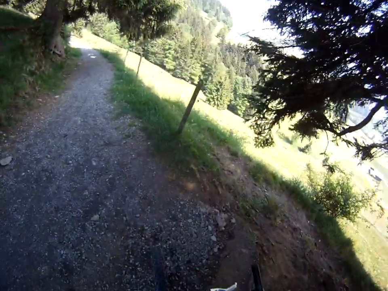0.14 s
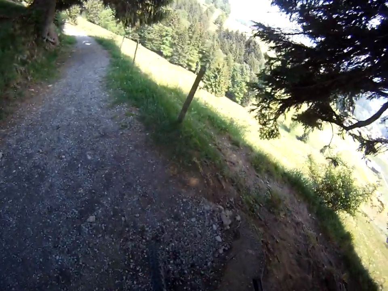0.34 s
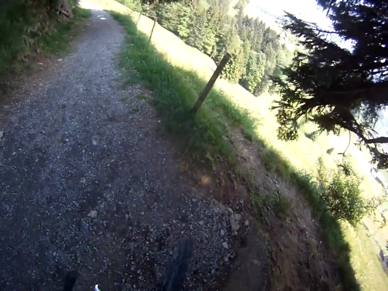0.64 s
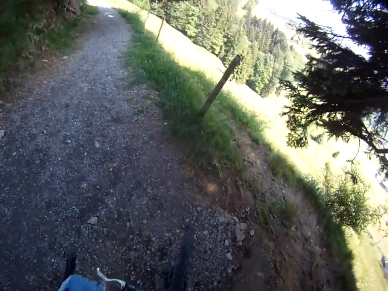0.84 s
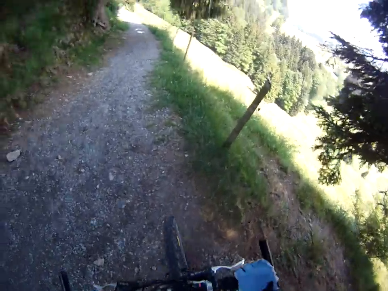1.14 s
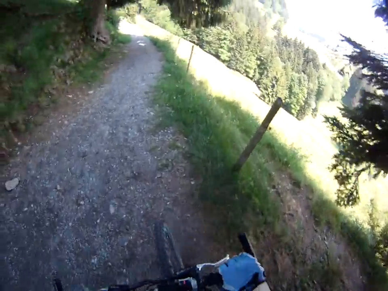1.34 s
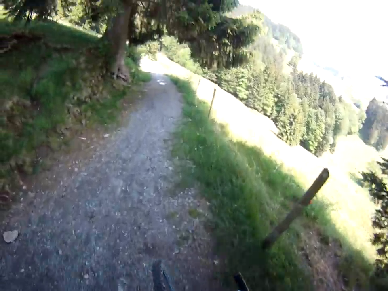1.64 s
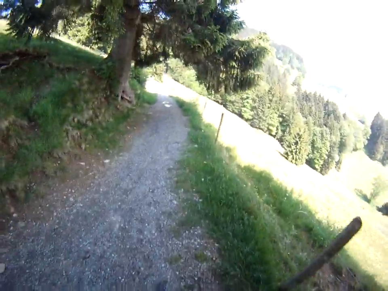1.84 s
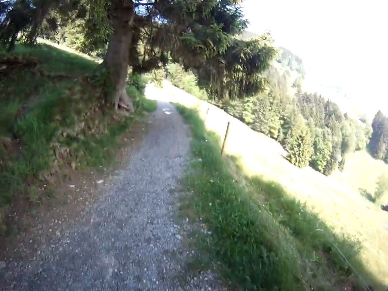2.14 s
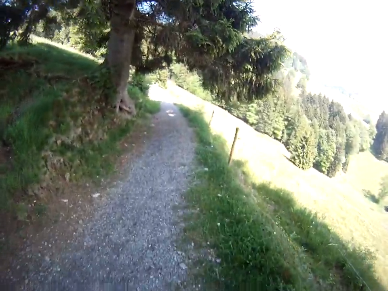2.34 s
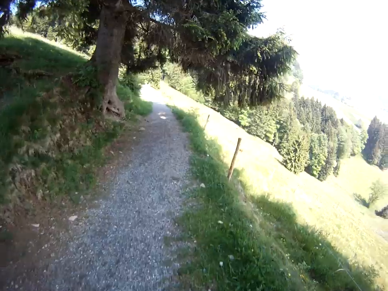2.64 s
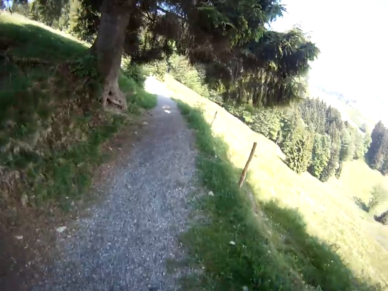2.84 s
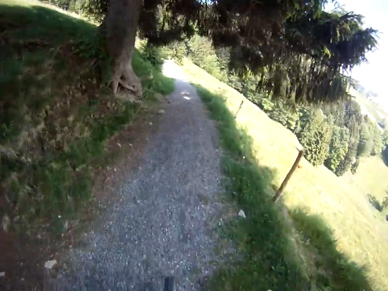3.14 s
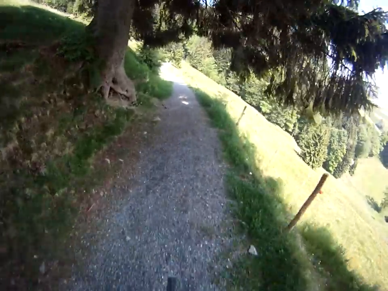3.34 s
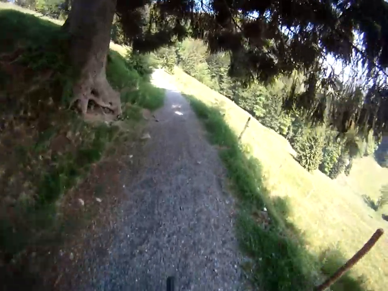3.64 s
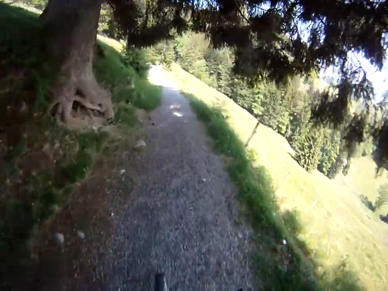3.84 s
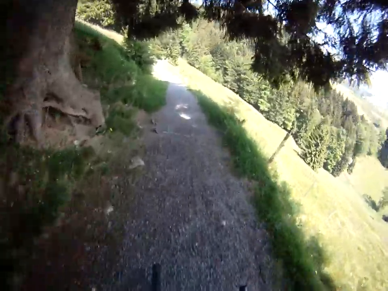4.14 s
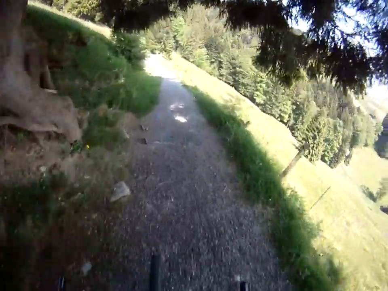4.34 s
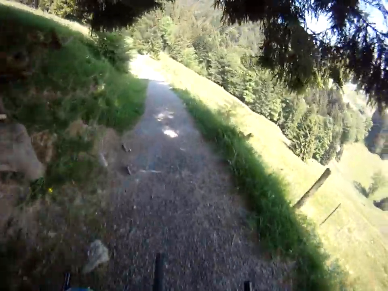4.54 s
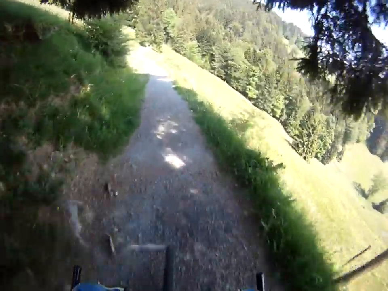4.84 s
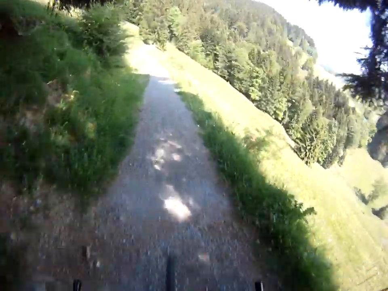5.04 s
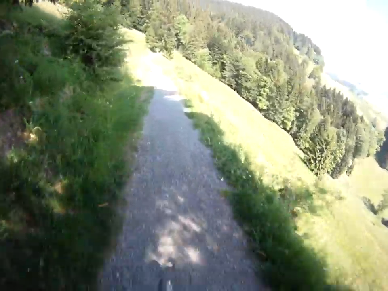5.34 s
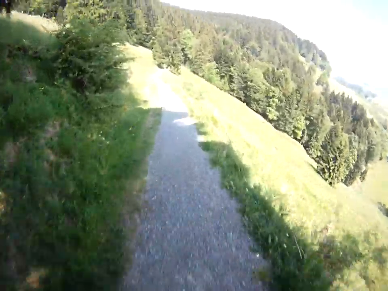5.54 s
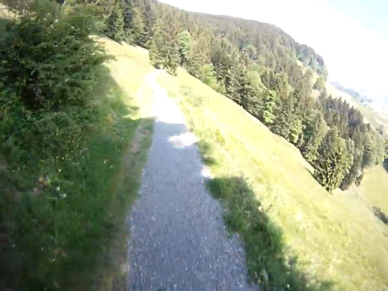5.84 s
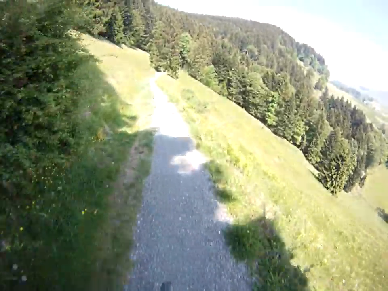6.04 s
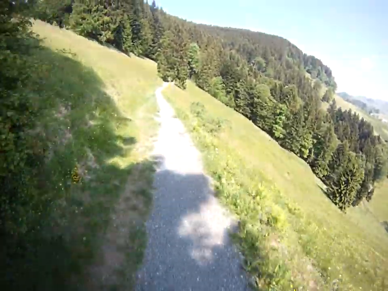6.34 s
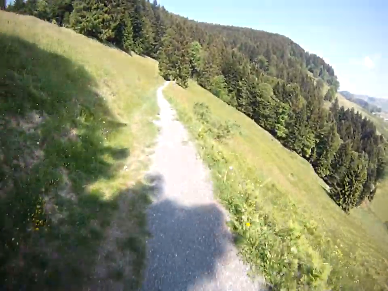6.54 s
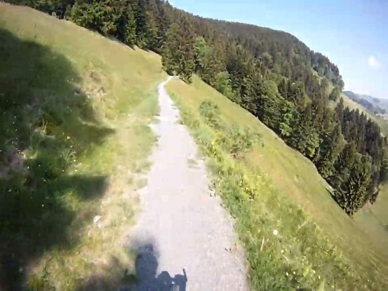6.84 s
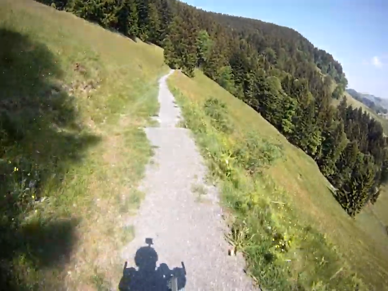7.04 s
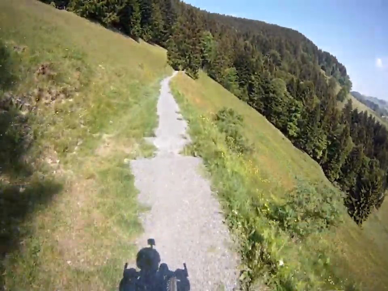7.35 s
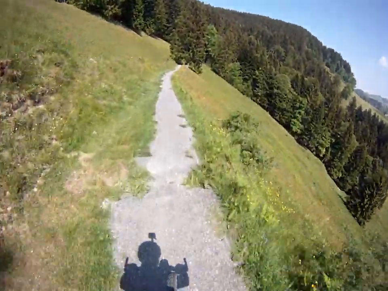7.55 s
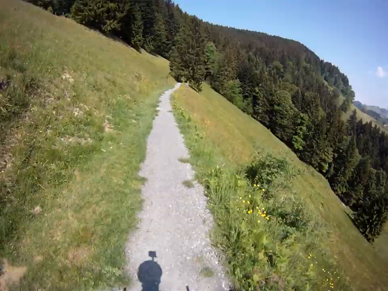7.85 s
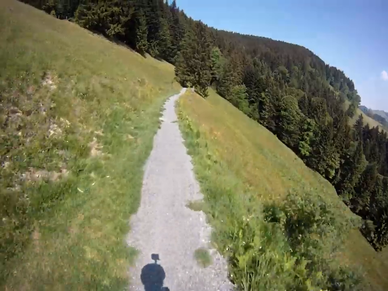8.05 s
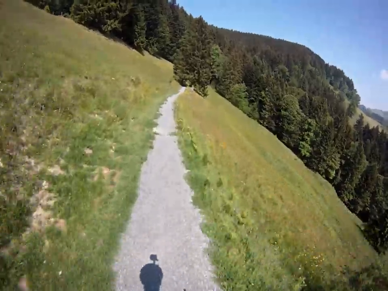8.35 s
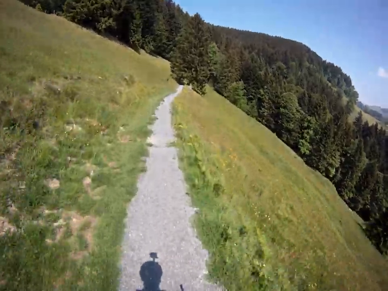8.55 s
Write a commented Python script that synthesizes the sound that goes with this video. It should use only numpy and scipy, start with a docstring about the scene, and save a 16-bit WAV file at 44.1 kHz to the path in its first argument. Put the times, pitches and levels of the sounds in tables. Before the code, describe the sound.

A bike descends an open hillside gravel path, gathering speed. Dry, hollow plastic knocks from a shaky mount dominate in short uneven clusters, early, around four seconds, and hardest near the end. Between them are quiet gravel hiss, light chain and cable chatter, low wobbling thumps and wind rumble, plus a faint thin birdcall midway. Close, dry, identical in both channels, heard through a case with rough metallic treble.

```python
"""A mountain bike rolls down a gravel path with an action camera in a loose plastic mount.
Throughout, tyres crunch (shaped noise), bike parts chatter (click showers) and wind buffets (low noise).
Near 1.5 s, 4.2 s and 8.1 s rough ground swells tyres, wind and camera sway; blows ring the mount's modes
at scattered times, the hardest near 1.1 s and 8.2 s; just before 5 s a small bird whistles gliding tones.
All is heard through the case and sampled at a low rate, which mirrors the sound into the treble."""
import sys
import numpy as np
from scipy import signal
from scipy.fft import rfft, irfft
from scipy.io import wavfile
from scipy.ndimage import uniform_filter1d

SR = 44100
rng = np.random.default_rng(int(sys.argv[2]) if len(sys.argv) > 2 else 0)


def generate_wav(sig):
    """Save sig (samples, or channels by samples) to the path in sys.argv[1] as 16-bit PCM at SR."""
    pcm = np.round(np.clip(np.atleast_2d(sig).T, -1, 1) * 32767).astype(np.int16)
    wavfile.write(sys.argv[1], SR, pcm)


N = 383229
TIME = np.arange(N) / SR


def undb(db):
    """Level law: decibels to amplitude gain."""
    return 10 ** (np.asarray(db) / 20)


def unit(x):
    """Normalisation: scale to rms 1."""
    return x / np.sqrt(np.mean(x ** 2))


def add(out, s, x):
    """Superposition: mix x into out from time s on."""
    i = int(s * SR)
    out[i:i + len(x)] += x[:N - i]


def colour(x, points):
    """Spectral shaping: filter by (f/Hz, level/dB) points, falling 20 dB per octave past the ends."""
    hz, db = np.transpose(points)
    bin_hz = np.arange(len(x) // 2 + 1) * SR / len(x)
    octave, point_octave = np.log2(np.maximum(bin_hz, 1)), np.log2(hz)
    outside = np.abs(octave - np.clip(octave, point_octave[0], point_octave[-1]))
    gain = undb(np.interp(octave, point_octave, db) - 20 * outside)
    return irfft(rfft(x) * gain, len(x))


def band(x, lo_hz, hi_hz, order=2):
    """Causal band-pass filtering."""
    return signal.sosfilt(signal.butter(order, [lo_hz, hi_hz], "band", fs=SR, output="sos"), x)


def walk(rate):
    """Slow random modulation: random levels held for 1 / rate s and smoothed twice, with rms 1."""
    hold = int(SR / rate)
    steps = np.repeat(rng.standard_normal(N // hold + 1), hold)
    smooth = uniform_filter1d(uniform_filter1d(steps, hold), hold)
    return unit(smooth[:N])


def grains(rate, spread_db):
    """Random impulse train: rate clicks per second on average, most small and a few large."""
    size = undb(spread_db * np.minimum(rng.exponential(size=N), 5))
    return unit((rng.random(N) < rate / SR) * size * rng.choice([-1, 1], N))


# course of the ride downhill: (t/s, speed relative to cruising)
SPEED = [(0.0, 0.67), (1.2, 0.64), (2.8, 0.77), (4.8, 0.99), (7.3, 1.137), (8.69, 1.14)]
# rough stretches of path: (middle t/s, length/s, extra shaking level/dB)
ROUGH = [(1.46, 1.42, 14.5), (4.19, 0.64, 13), (8.1, 0.4, 8)]


def ride(law):
    """Power law of speed: a layer's gain grows with each doubling and swells over rough stretches."""
    cruise_db, doubling_db, share = law
    speed = np.interp(TIME, *np.transpose(SPEED))
    # the length is the full width at half the extra decibels
    shaking_db = sum(db / (1 + (2 * (TIME - s) / length) ** 6) for s, length, db in ROUGH)
    return undb(cruise_db + doubling_db * np.log2(np.maximum(speed, .01)) + share * shaking_db)


# limits of the modes in f/Hz: camera's weight, then arm, then shell; the rest belong to the edge
THUD_HZ, ARM_HZ, SHELL_HZ = 120, 500, 2800
# the thud grows faster than the jolt: only big bumps move the whole camera (dB per dB, dB)
THUD_GROWTH, THUD_DB = 1.7, 4.5
# the edge of the mount cracks on contact: (dB relative to the blow at the edge, decay s)
CRACK_DB, CRACK_S = -26, 0.0032
# modes of mount and case: (f/Hz, relative level/dB, t60/s)
MOUNT_MODES = [(48, -24, 0.1), (79, -15.5, 0.25), (164, -5, 0.013), (256.8, -13, 0.1), (500, -14, 0.0026),
               (747, -6.5, 0.05), (980, -2, 0.018), (1014, -0.5, 0.027), (1111, -5.5, 0.05),
               (1430, -6.5, 0.027), (1643, 2, 0.0097), (1903, 7.5, 0.0048), (2193, 2.5, 0.018),
               (2457, -13.5, 0.019), (3010, -13.5, 0.014), (3756, -11.5, 0.023), (5740, -17, 0.0037)]
# the mount hits its stops: (t/s, blow on the shell level/dB, jolt to the arm level/dB,
# brightness/dB per octave, snap of the edge level/dB, pitch factor of the modes above the arm)
KNOCKS = [(0.0545, -32.5, -31, -12.5, 21.5, 0.96), (0.4264, -22, -17, -1.5, -20, 0.98),
          (0.636, -45.5, -33, -6, -2, 1.0), (1.0976, -13.5, -27, -3.5, 9.5, 0.93),
          (1.1042, -9, -14, 0, 3, 0.95), (1.2077, -13, -17, -2, 0, 0.942),
          (1.7906, -21.5, -14.5, 7, -14, 0.96), (1.7948, -15, -21, 1, -4, 0.99),
          (1.945, -18.5, -18.5, 3.5, -16, .97), (2.016, -39, -54, 16, -15.5, 1.05),
          (2.0304, -30.5, -32, 12.5, -10.5, 0.98), (2.362, -36.5, -41, -6, 2, 1.05),
          (2.699, -36.5, -53, -1.5, 3, 0.99), (3.5393, -47.5, -54, 16, -13.5, 0.99),
          (4.028, -34, -33, -11, 14, 0.96), (4.113, -14.5, -13, 4.5, -10.5, 1.0),
          (4.12, -18.5, -17, -7, 9, 0.94), (4.149, -24.5, -33, 1.5, -10, 0.98),
          (4.1596, -26.5, -17.5, 1, -2, 0.94), (4.252, -19, -19, 2.5, -15.5, 0.99),
          (4.353, -44, -45, -13, 4, 0.84), (4.659, -26, -19.5, 4.5, -10, 0.88), (5.304, -45, -27, 8, -4, 1),
          (5.591, -39, -29.5, 0.5, 12, 1.02), (6.564, -52.5, -50, 16.5, -16, 1.06),
          (6.8788, -47, -46, 18, -28, 1.13), (8.1301, -10, -9.5, 9, -13, 0.96),
          (8.1361, -31, -14.5, -13, 20, 0.7), (8.155, -28, -20, -5, 0, 0.84),
          (8.1668, -30, -22, -9, 0, 0.97), (8.195, -25, -14, 2, -4, 0.6),
          (8.199, -20.5, -7.5, -2.5, 0, 0.81), (8.2047, -7.5, 1.5, -4, -1.5, 1.0),
          (8.2244, -17, -10.5, 1, -2, .96), (8.32, -21, -18.5, 3, -18, 1.0)]


def mount(detune=0.027, grit_db=-13, grit_t60=0.038, push_s=0.000068, pivot_hz=1000, edge_hz=3500):
    """Modal superposition: each blow rings damped modes, then the parts grind briefly as they settle."""
    out, t = np.zeros(N), np.arange(SR // 3) / SR
    hz, db, t60 = np.transpose(MOUNT_MODES)
    sign = (-1) ** np.arange(len(hz))  # neighbouring modes swing in opposite directions
    decay = np.exp(-np.log(1000) * np.outer(1 / t60, t))
    settling = (1 - np.exp(-t / 0.0018)) * np.exp(-np.log(1000) * t / grit_t60)
    for s, blow_db, jolt_db, bright_db, snap_db, pitch in KNOCKS:
        thud_db = THUD_DB + THUD_GROWTH * jolt_db
        shell_db = blow_db + bright_db * np.log2(hz / pivot_hz) + snap_db * (hz > SHELL_HZ)
        gain = sign * undb(db + np.select([hz < THUD_HZ, hz < ARM_HZ], [thud_db, jolt_db], shell_db))
        # pressure at the contact retunes the shell and edge but not the arm
        retuned = hz * pitch * (1 + detune * rng.standard_normal(len(hz)))
        tuned = np.where(hz > ARM_HZ, retuned, hz)
        ring = gain @ (np.sin(2 * np.pi * np.outer(tuned, t)) * decay)
        crack = unit(band(rng.standard_normal(len(t)), 2000, 4900)) * np.exp(-t / CRACK_S)
        ring += crack * undb(CRACK_DB + blow_db + bright_db * np.log2(edge_hz / pivot_hz) + snap_db)
        ring *= 1 - np.exp(-t / push_s)  # plastic gives a little
        grit = settling * rng.standard_normal(len(t)) ** 3
        grit *= undb(grit_db) / np.linalg.norm(grit)
        add(out, s, ring + signal.fftconvolve(ring, grit)[:len(t)])
    return out


# sway against the ride: (cruising level/dB, dB per doubling of speed, share of extra shaking)
SWAY_LAW = (-42.5, 10.7, 0.76)
SWING_S = 0.025  # time from a swing's peak until its extra decibels fall to 1/e
# big bumps set the camera swinging: (t/s, extra level/dB)
BUMPS = [(1.07, 10), (2.49, 10), (3.46, 13.5), (3.7, 10), (4.21, 6), (4.36, 8), (4.74, 14.5), (5.01, 11),
         (5.23, 9.5), (6.58, 10.5), (8.23, 16)]


def sway(low_hz=24, high_hz=37, flutter_db=2.2, top_hz=49):
    """Noise-driven resonance: the camera wobbles unevenly on its arm, with extra swings on big bumps."""
    swing = signal.hilbert(band(rng.standard_normal(N), low_hz, high_hz))
    # the arm stiffens on wide swings, which evens out their size
    wobble = swing.real / np.sqrt(np.abs(swing) ** 2 + 2.0 * np.var(swing))
    bumps_db = sum(db * np.exp(-((TIME - s) / SWING_S) ** 2) for s, db in BUMPS)
    wobble = unit(wobble) * ride(SWAY_LAW) * undb(bumps_db + flutter_db * walk(13))
    return signal.sosfiltfilt(signal.butter(4, top_hz, fs=SR, output="sos"), wobble)


# gravel as heard through the case: (f/Hz, relative level/dB per Hz)
GRAVEL = [(300, -14), (550, -10), (800, -10.5), (1030, 1.5), (1250, -5), (1500, 0), (1800, -8.5),
          (2020, 4.5), (2400, 0), (2780, -12), (3100, -4), (3650, -9.5), (4200, -20), (5400, -13.5)]
# crunch and roll against the ride: (cruising level/dB, dB per doubling of speed, share of extra shaking)
CRUNCH_LAW = (-56, 10.2, 0.11)
ROLL_LAW = (-61.5, 10.4, 0.21)


def tyres(patchy_db=0.3):
    """Granular friction: stones grind in uneven spurts over the smoother roll and hiss of fine grit."""
    spurts = undb(2.2 * walk(45))
    spurts = spurts * undb(patchy_db * walk(10))  # the gravel lies in patches
    # stones of different sizes click in different ranges, each in clumps of their own
    stones = np.zeros(N)
    for lo, hi in [(1600, 2200), (2200, 2800), (2800, 3400), (3400, 4200)]:
        stones += band(grains(rate=1100, spread_db=2.6) * undb(2 * walk(70)), lo, hi, order=4)
    grit = band(rng.standard_normal(N), 3760, 5670, order=3)
    crunch = unit(colour(stones * spurts + undb(2.5) * grit * np.sqrt(spurts), GRAVEL))
    rolling = grains(rate=1500, spread_db=1.5) * spurts + rng.standard_normal(N)
    roll = unit(band(colour(rolling, GRAVEL), 260, 1180))
    # single stones snap aside and briefly ring the case
    snaps = grains(rate=32, spread_db=3.6)
    ticks = unit(band(snaps, 2800, 4900)) + undb(1) * unit(band(snaps, 1970, 2310))
    return (crunch + ticks * undb(-14.5)) * ride(CRUNCH_LAW) + roll * ride(ROLL_LAW)


# harder shakes stir the larger, hollow parts more (dB per dB)
HOLLOW_GROWTH = 1.45
# chain and cables chatter: (t/s, relative level/dB, decay time/s)
CHATTER = [(0.107, -46, 0.013), (.2309, -50, 0.006), (0.468, -45, 0.029), (0.567, -44.5, 0.019),
           (0.9825, -46, 0.0056), (1.137, -39.5, 0.011), (1.3203, -38.5, 0.016), (1.656, -42, 0.0054),
           (1.781, -29, .011), (1.941, -35.5, 0.014), (2.321, -44.5, 0.016), (2.373, -38.5, .01),
           (2.726, -37.5, 0.014), (3.056, -44.5, 0.0061), (3.154, -41.5, 0.006), (3.363, -42, 0.005),
           (3.67, -41, 0.0085), (3.874, -29.5, 0.016), (4.059, -40, 0.01), (4.3865, -30.5, 0.022),
           (4.431, -35, 0.019), (4.805, -36, 0.015), (4.8383, -35, 0.0084), (4.907, -42.5, 0.0037),
           (5.4663, -38, 0.0083), (5.588, -37, 0.0025), (5.83, -36.5, 0.0049), (6.318, -34.5, 0.028),
           (6.5827, -34, 0.0047), (6.877, -35, 0.014), (7.132, -38, 0.0087), (7.5926, -38.5, .009),
           (7.7793, -35.5, 0.0053), (7.874, -36.5, .011), (8.387, -40.5, 0.011), (8.45, -38, .01)]


def chatter(bright_db=-16, hollow_db=-7):
    """Impact showers: many small contacts on the bike, bright when light, more hollow when hard."""
    out, t = np.zeros(N), np.arange(SR // 10) / SR
    clicks = colour(grains(rate=2500, spread_db=1.5), GRAVEL)
    bright, hollow = band(clicks, 2110, 4840), band(clicks, 620, 1124)
    for s, db, length in CHATTER:
        i = int(s * SR)
        shape = (1 - np.exp(-t / 0.0012)) * np.exp(-t / max(length, .002))
        high = unit(shape * bright[i:i + len(t)])
        low = unit(shape * hollow[i:i + len(t)])
        add(out, s, undb(db + bright_db) * high + undb(HOLLOW_GROWTH * db + hollow_db) * low)
    return out


def jiggle(rate=9, level_db=-51, decay_s=0.01):
    """Random shot process: chain and cables jiggle faintly, about rate shakes per second."""
    t = np.arange(SR // 10) / SR
    shakes = (rng.random(N) < rate / SR) * (1 + rng.random(N)) / 2
    shape = signal.fftconvolve(shakes, (1 - np.exp(-t / 0.00033)) * np.exp(-t / decay_s))[:N]
    clicks = unit(band(colour(grains(rate=2000, spread_db=2.5), GRAVEL), 1000, 6300))
    return clicks * shape * unit(ride(CRUNCH_LAW)) * undb(level_db)


# wind on the case: (f/Hz, relative level/dB per Hz)
WIND = [(25, -13.5), (45, -1.5), (65, -6), (100, -11.5), (170, -16), (250, -16.5), (330, -22.5), (600, -25)]
# wind against the ride: (cruising level/dB, dB per doubling of speed, share of extra shaking)
WIND_LAW = (-57, 5.6, 0.1)


def wind(gust_db=0.57):
    """Turbulent pressure noise: eddies buffet the case with slow, slight gusts."""
    eddies = unit(band(colour(rng.standard_normal(N), WIND), 43, 1500))
    return eddies * ride(WIND_LAW) * undb(gust_db * walk(6.5))


SONG_S, CALL_EVERY_S, BIRD_DB = 4.955, .139, -59
# the call, a falling sweep and a short low note: (t/s after its start, length/s, start f/Hz, end f/Hz)
CALL = [(0, .036, 5350, 3800), (.034, .026, 3740, 3830)]
# the close, two rising notes, in the same columns
CLOSING = [(0, .024, 3800, 3950), (.043, .028, 3900, 4200)]


def bird(count=4):
    """Frequency-modulated tones: a thin, wavering call, evenly repeated, then a rising close."""
    out = np.zeros(N)
    waver = 1 + .025 * walk(700)
    for k, notes in enumerate([CALL] * count + [CLOSING]):
        for delay, length, start_hz, end_hz in notes:
            s = SONG_S + k * CALL_EVERY_S + delay
            u = np.linspace(0, 1, int(length * SR))
            hz = (start_hz + (end_hz - start_hz) * u) * waver[int(s * SR):][:len(u)]
            add(out, s, np.sin(2 * np.pi * np.cumsum(hz) / SR) * np.sin(np.pi * u))
    return out * undb(BIRD_DB + 3.5 * walk(200))


def scene():
    """Superposition: one microphone inside the case feeds both channels."""
    mono = mount() + chatter() + jiggle() + tyres() + wind() + sway() + bird()
    return np.array([mono, mono])


ADC_HZ, HOLD_HZ, TOP_HZ = 12000, 48000, 15500  # converter rate, rate of the held signal, top of the output


def record(dry):
    """Zero-order hold: a converter clips near full scale, and held samples mirror sound above its range."""
    dry = signal.sosfilt(signal.ellip(6, .3, 50, 5800, fs=SR, output="sos"), dry)
    samples = np.clip(signal.resample_poly(dry, ADC_HZ, SR, axis=1), -.92, .92)
    held = np.repeat(samples, HOLD_HZ // ADC_HZ, axis=1)
    out = signal.resample_poly(held, SR, HOLD_HZ, axis=1)[:, :N]
    return signal.sosfiltfilt(signal.ellip(8, .1, 60, TOP_HZ, fs=SR, output="sos"), out)


dry = scene()
out = record(dry)
generate_wav(out)
```